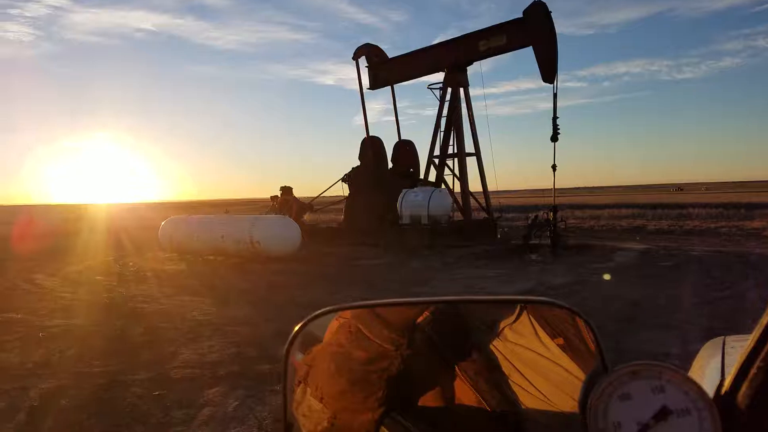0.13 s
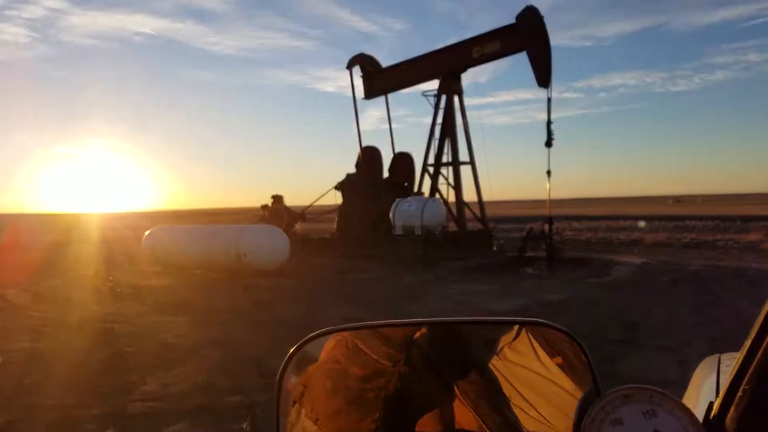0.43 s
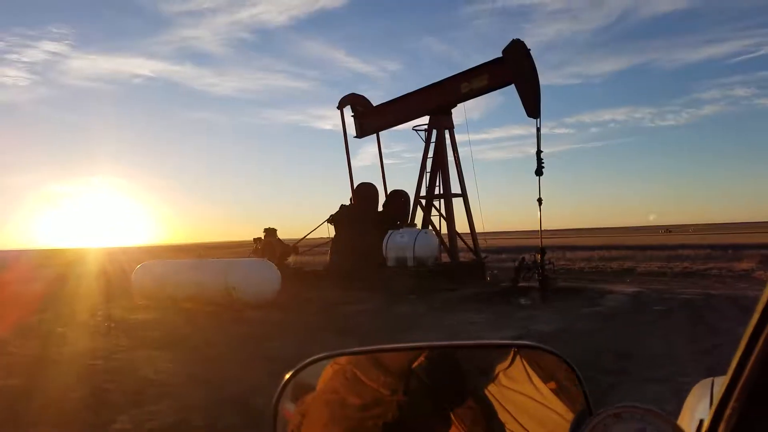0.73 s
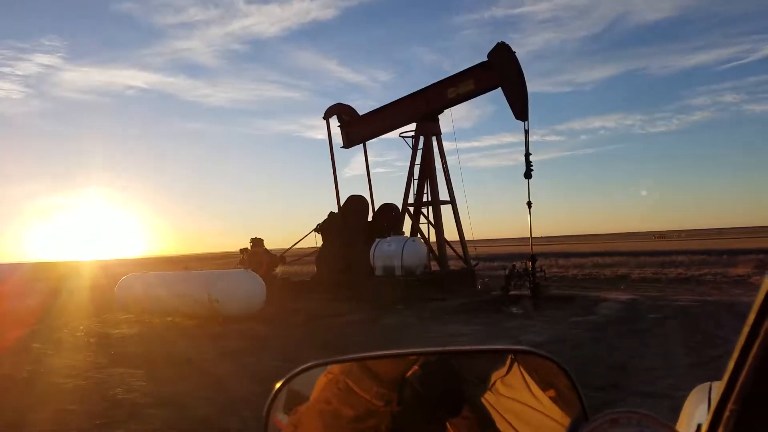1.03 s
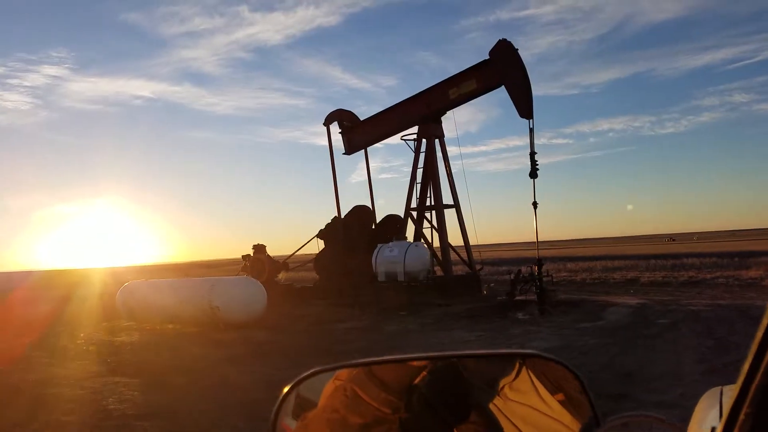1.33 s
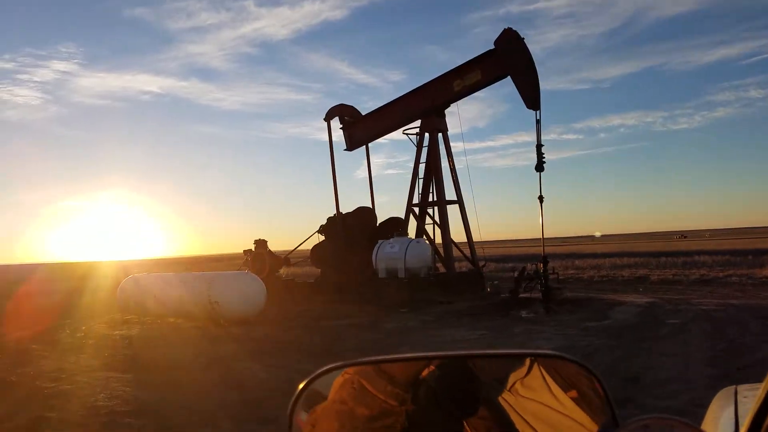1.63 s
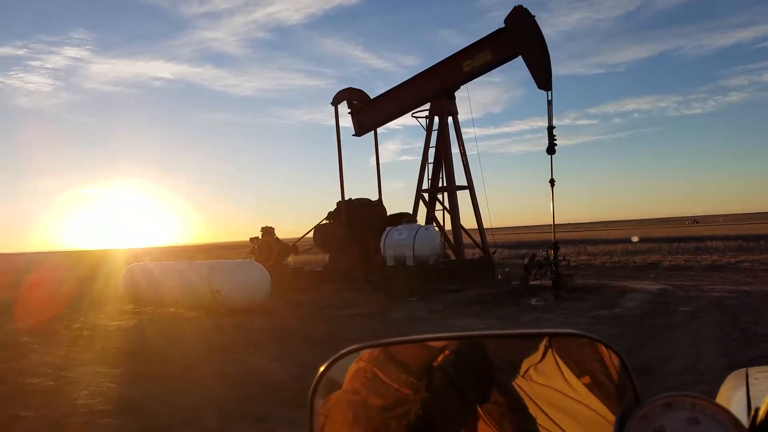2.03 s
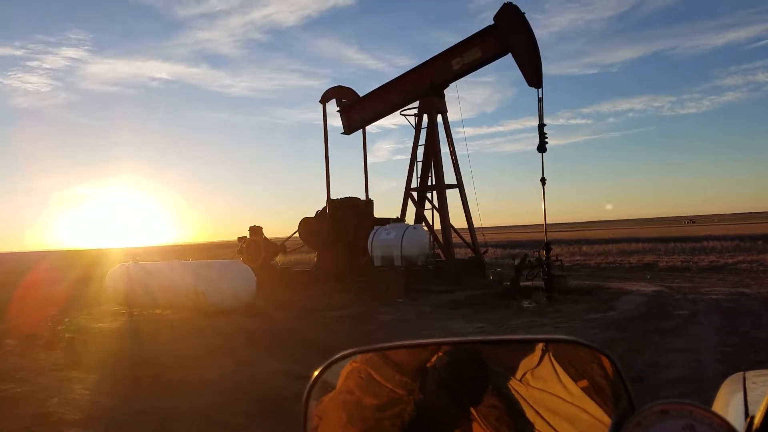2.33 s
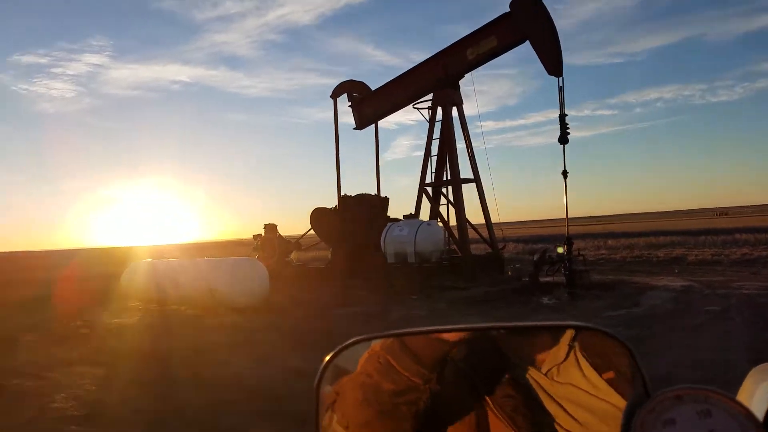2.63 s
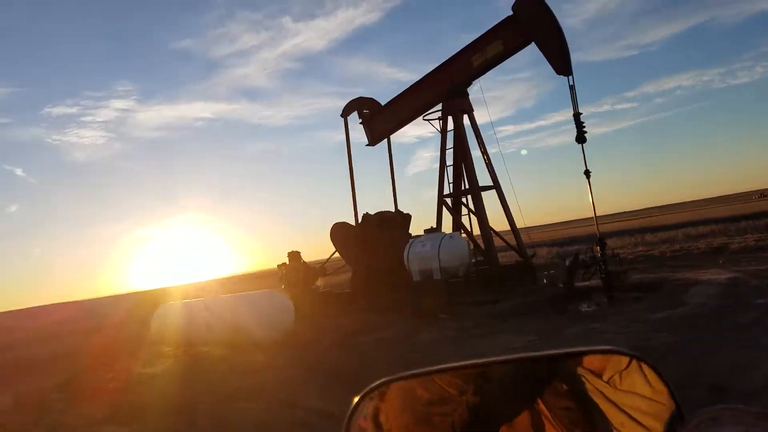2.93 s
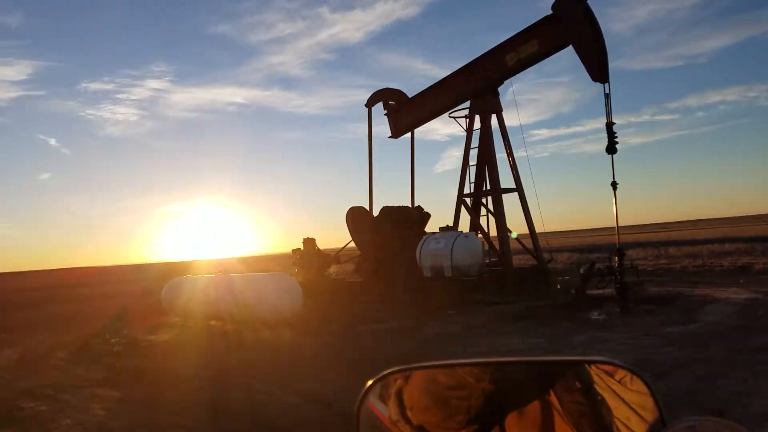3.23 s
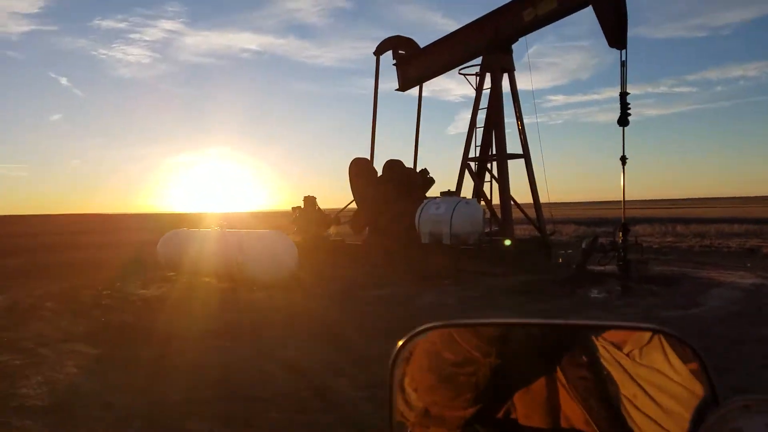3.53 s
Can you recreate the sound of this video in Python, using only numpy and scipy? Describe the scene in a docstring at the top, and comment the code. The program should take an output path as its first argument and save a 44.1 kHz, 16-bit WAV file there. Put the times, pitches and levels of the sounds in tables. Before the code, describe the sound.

Rough engine rumble at an oil pump, chuffing about four times a second with high dry squeaks.

```python
"""After a brief silence, a lumpy eight-cylinder engine is heard already idling close by on open ground:
uneven firings boom in its exhaust under throbbing fan noise and valve ticks. With it something dry,
probably a belt, chafes and soon rasps, amid faint treble wisps. After a dry knock an oil pumpjack's slow
engine chuffs about four times a second, each puff of gas ringing its metal. Then loose parts rattle now
and then, the belt squeaks on and off as a gliding tone with its octave, and a few thin chirps glide above;
a softer knock comes late."""
import sys
import numpy as np
from scipy import signal
from scipy.fft import rfft, irfft, next_fast_len
from scipy.io import wavfile

SR = 44100
rng = np.random.default_rng(int(sys.argv[2]) if len(sys.argv) > 2 else 0)


def to_wav(sig):
    """Store sig (one row per channel, or 1-D mono) as 16-bit WAV at the path in sys.argv[1].

    Samples outside -1..1 are clipped; the rate is SR.
    """
    pcm = np.clip(np.atleast_2d(sig), -1, 1) * 32767
    pcm = np.round(pcm).astype(np.int16)
    wavfile.write(sys.argv[1], SR, pcm.T)  # frames by channels


N = 163170


def undb(db):
    """Decibels to gain."""
    return 10 ** (np.asarray(db) / 20)


def unit(x):
    """Scale to rms 1."""
    return x / np.sqrt(np.mean(x ** 2))


def times():
    """Time of each sample in seconds."""
    return np.arange(N) / SR


def curve(rows, axis=1):
    """Join the rows of a control by straight lines."""
    rows = np.array(rows)
    return np.interp(times(), rows[:, 0], rows[:, axis])


def filtered(x, response):
    """Apply a frequency response, given as a function of Hz."""
    size = next_fast_len(N + N // 2)
    f = np.maximum(np.fft.rfftfreq(size, 1 / SR), 1)
    return irfft(rfft(x, size) * response(f), size)[..., :N]


def colour(x, points):
    """Filter by (Hz, dB) points, joined along log frequency."""
    hz, db = np.array(points).T
    return filtered(x, lambda f: undb(np.interp(np.log(f), np.log(hz), db)))


def resonance(f, hz, width):
    """Response of one resonance, 1 at its centre."""
    return 1 / (1 + 1j * (f / hz - hz / f) * hz / width)


def highpass(f, hz):
    """Response of a second-order high-pass."""
    s = 1j * f / hz
    return s * s / (1 + np.sqrt(2) * s + s * s)


def lowpass(f, hz):
    """Gentle treble loss, halving the amplitude at hz, with no phase shift."""
    return 1 / (1 + (f / hz) ** 2)


def walk(rate):
    """Random points, `rate` a second, joined by straight lines; spread near 1."""
    knots = rng.standard_normal(N)
    return np.interp(times() * rate, np.arange(N), knots) * np.sqrt(3 / 2)


def pan(db):
    """Left and right gains, for left over right in dB."""
    return undb(np.array([[db], [-db]]) / 2)


def burst(start, attack, decay):
    """Linear attack, exponential decay."""
    age = times() - start
    return np.clip(age / attack, 0, 1) * np.exp(-np.clip((age - attack) / decay, 0, 20))


def arch(u):
    """Rounded swell over u = 0..1."""
    return np.sqrt(np.abs(np.sin(np.pi * np.clip(u, 0, 1))))


def tone(hz, rough):
    """A sine of rms 1 whose pitch trembles by the share `rough`."""
    trembling_hz = hz * (1 + rough * walk(rate=1800))
    return unit(np.sin(2 * np.pi * np.cumsum(trembling_hz) / SR))


def after(pulses, decay):
    """Envelope of rms 1 that jumps at every pulse and dies away."""
    return unit(signal.lfilter([1], [1, -np.exp(-1 / (decay * SR))], pulses))


# stereo spread of all the noise: (f/Hz, side over mid/dB)
SIDE_DB = [(30, 12), (80, -16.5), (180, -16), (350, -9.5), (700, -10.5), (1400, -4), (2800, 0.5),
           (6000, -1), (12000, 0.5)]


def air():
    """Stereo noise from a white mid and a coloured side, narrow in the low mids and wide in the treble."""
    mid, side = rng.standard_normal((2, N))
    side = colour(side, SIDE_DB)
    return np.array([mid + side, mid - side])


CYCLE_S, JITTER_S = .19088, .0003  # all eight firings; random spread of each firing's time
# cylinders in firing order: (delay to the tailpipe/s, level/dB)
CYLINDERS = [(.0209, 3.8), (.0174, -5.4), (.0212, -2), (.0193, 1.7), (.021, -8.7), (.0214, 6.3),
             (.0203, 2.6), (.0197, -.6)]


def firings():
    """One pulse per cylinder, each with its own strength and a little off in time."""
    delay, db = np.array(CYLINDERS).T
    k = np.arange(int(N / SR / CYCLE_S * len(db)) + 1)
    cylinder = k % len(db)
    at = k * CYCLE_S / len(db) + delay[cylinder] + JITTER_S * rng.standard_normal(len(k))
    pulses = np.zeros(N)
    pulses[np.clip((at * SR).astype(int), 0, N - 1)] = undb(db[cylinder])
    return pulses


EXHAUST_DB, RUMBLE_DB = 27.5, -43.5
PIPE_CUT_HZ, MUFFLER_HZ = 42.4, 900  # low cut and treble loss of the boom
# exhaust resonances: (f/Hz, width/Hz, signed gain)
PIPE = [(70.9, 9, .58), (88.6, 9, .46), (97, 22, -.44), (126.7, 9, .13), (158, 9, -.1), (176, 10, -.12)]
# colour of the gas rumble: (f/Hz, relative level/dB)
RUMBLE = [(20, -15), (40, -26), (60, -8), (100, 7), (172, 3.5), (192, -9), (400, -62)]
# level ride of boom and rumble together: (t/s, level/dB)
BASS = [(.105, 9.5), (.148, -3.5), (.16, 11), (.36, 12.5), (.45, 7), (.6, 8), (.72, 2.5), (.85, 0),
        (1.4, 0), (1.8, 1.15), (3.7, 0.6)]


def exhaust(pulses):
    """Firings ring the muffled pipe; turbulent gas rumbles with them."""
    def pipe(f):
        modes = sum(gain * resonance(f, hz, width) for hz, width, gain in PIPE)
        return modes * highpass(f, PIPE_CUT_HZ) / (1 + (f / MUFFLER_HZ) ** 4)

    boom = filtered(pulses, pipe)
    gas = unit(colour(air() * after(np.sqrt(pulses), decay=0.07), RUMBLE))
    return (undb(EXHAUST_DB) * boom + undb(RUMBLE_DB) * gas) * undb(curve(BASS))


FAN_DB, TICK_DB, TICK_S = -41, -47.5, 0.0086  # TICK_S: decay
FAN_THROB, THROB_DECAY = 0.16, 0.38  # depth; decay as a share of the mean firing interval
TREBLE_FLICKER_DB, TREBLE_FLICKER_RATE = 1.35, 27  # spread; random points a second
# colour of the fan noise ahead of its low cut: (f/Hz, relative level/dB)
FAN = [(120, -43), (205, 0), (270, 4), (360, -2), (401, 4), (456, -3), (579, -2.5), (635, -6), (851, -4.5),
       (1140, -6), (1680, -11), (2470, -11.5), (2910, -14.5), (3970, -16.5), (5130, -25.5), (7830, -19),
       (16000, -43.5)]
# level ride of the fan, crossing over near 1 kHz: (t/s, low level/dB, high level/dB)
FAN_LEVEL = [(.1, -2.5, -5), (.2, 1.5, 0.5), (.8, 0, 2.5), (1.5, 1, 2.5), (2, 2.5, 3.5), (2.9, 2.5, 2.5),
             (3.52, 2.5, 2), (3.6, 6, 5), (3.7, 0.5, 4)]
# colour of the valve ticks: (f/Hz, relative level/dB)
TICKS = [(200, -20), (500, 3), (1300, 15.5), (3000, -9.5), (5000, -12), (8000, -12), (15000, -43)]


def engine_bay(pulses):
    """Fan noise flickers, its lower part throbbing with the firings; the valves tick."""
    fan = unit(filtered(colour(air(), FAN), lambda f: highpass(f, hz=182) ** 2))
    low = filtered(fan, lambda f: lowpass(f, 1000))
    flicker_db = TREBLE_FLICKER_DB * walk(TREBLE_FLICKER_RATE)
    high = (fan - low) * undb(curve(FAN_LEVEL, axis=2) + flicker_db) * pan(db=3.5)
    throb_decay = THROB_DECAY * CYCLE_S / len(CYLINDERS)
    throb = unit(1 + FAN_THROB * after(np.sqrt(pulses), throb_decay))
    fan = low * undb(curve(FAN_LEVEL)) * throb + high
    # one tick per firing, of random strength
    strikes = (pulses > 0) * undb(2.8 * walk(rate=60))
    ticks = unit(colour(air(), TICKS) * after(strikes, TICK_S))
    return undb(FAN_DB) * fan * undb(0.99 * walk(rate=45)) + undb(TICK_DB) * ticks


SLIP_RATE, SLIP_S = 45, .02  # mean slips a second; longest slip
SLIP_SCATTER_DB, SLIP_GLIDE = 2.5, 0.0306  # spread of strength; spread of glide as a share of pitch


def slips(centre_hz, spread_hz):
    """Pitch and envelope of a chain of tiny slips, each with its own length, pitch, glide and strength."""
    count = int(2 * SLIP_RATE * N / SR)
    gap, pitch = rng.random((2, count))
    glide, size = rng.standard_normal((2, count))
    starts = np.cumsum(.5 + gap) / SLIP_RATE
    k = np.maximum(np.searchsorted(starts, times()) - 1, 0)
    length = np.minimum(SLIP_S, starts[k + 1] - starts[k])
    u = np.clip((times() - starts[k]) / length, 0, 1)
    slip_hz = centre_hz + spread_hz * (2 * pitch[k] - 1)
    hz = slip_hz * (1 + SLIP_GLIDE * glide[k] * (u - .5))
    return hz, arch(u) * undb(SLIP_SCATTER_DB * size[k])


SQUEAK_PAN_DB, SQUEAK_LAG_S = -9, .00003  # left over right; delay of the right side
OCTAVE_DB, OCTAVE_BEST_HZ, OCTAVE_WIDTH_HZ = -5.5, 7960, 430


def squeal(hz, octave_db):
    """A stick-slip tone, later on the right, whose octave sings out only near one resonance."""
    phase = 2 * np.pi * (np.cumsum(hz) / SR + np.outer([1, 0], hz * SQUEAK_LAG_S))
    octave = undb(octave_db) * np.abs(resonance(2 * hz, OCTAVE_BEST_HZ, OCTAVE_WIDTH_HZ)) ** 2
    return np.sqrt(2) * (pan(SQUEAK_PAN_DB) * np.sin(phase) + octave * np.sin(2 * phase))


CHAFE_HZ, CHAFE_SPREAD_HZ, CHAFE_DB = 3750, 380, -54.5


def belt_chafe():
    """Faint broken stick-slip tones run on between the squeaks."""
    hz, swell = slips(CHAFE_HZ, CHAFE_SPREAD_HZ)
    rough_hz = hz * (1 + .02 * walk(rate=800))
    return undb(CHAFE_DB) * swell * squeal(rough_hz, OCTAVE_DB)


THIN_ROUGH = .015  # pitch roughness of wisps and chirps, as a share
WISP_HZ, WISP_SPREAD_HZ = 10400, 3400
WISP_DB, WISP_DB_PER_OCTAVE = -60.5, -17  # level at WISP_HZ; fall towards higher pitch


def wisps():
    """Faint squeaky slips scatter through the treble, a separate chain on either side."""
    sides = []
    for _ in range(2):
        hz, swell = slips(WISP_HZ, WISP_SPREAD_HZ)
        db = WISP_DB + WISP_DB_PER_OCTAVE * np.log2(hz / WISP_HZ)
        sides.append(undb(db) * swell * tone(hz, THIN_ROUGH))
    return np.array(sides)


RASP_HZ, RASP_WANDER_HZ, RASP_ROUGH = 7680, 190, .037  # centre; slower wander; fast tremble as a share
# thin high rasps: (t/s, length/s, level/dB)
RASPS = [(0.15, 0.19, -51.5), (0.556, 0.078, -49), (.76, 0.16, -51), (1.034, 0.14, -47.5),
         (1.892, .14, -43), (2.275, 0.29, -52), (2.558, 0.013, -43), (2.807, 0.057, -46.5),
         (3.588, 0.17, -45)]


def belt_rasps():
    """Rough tones about an octave above the squeaks, trembling separately left and right."""
    hz = RASP_HZ + RASP_WANDER_HZ * walk(rate=86)
    rasp = np.array([tone(hz, RASP_ROUGH) for _ in range(2)])
    return rasp * sum(undb(db) * arch((times() - s) / length) for s, length, db in RASPS)


# small knocks: (t/s, level/dB, decay/s, dull above f/Hz)
KNOCKS = [(.154, -18.5, 0.00097, 1870), (2.78, -39, .003, 7000)]


def knocks():
    """Small dry knocks: dulled noise that starts at once and dies in milliseconds."""
    out = 0
    for s, db, decay, hz in KNOCKS:
        noise = unit(filtered(air(), lambda f: lowpass(f, hz)))
        out = out + undb(db) * burst(s, 0.0001, decay) * noise
    return out


CHUFF_DB, CHUFF_ATTACK_S, CHUFF_DECAY_S = -37.5, 0.0094, 0.018  # the gas; the metal shares its attack
CHUFF_PAN_DB, CHUFF_PAN_DB_PER_S = 9, -2.3  # left over right; the pump drifts to the middle
RING_GRAIN_DB = 2  # random spread of the ring's level
# colour of the gas puffs: (f/Hz, relative level/dB)
CHUFF = [(300, -4), (900, -25), (1200, 21), (1600, -6), (2200, 7), (3200, 6.5), (5500, 3), (8000, 11),
         (10500, 4), (15000, -65)]
# ringing modes of the pump engine's metal, lowest first: (f/Hz)
PUMP_MODES_HZ = [1140, 2083, 2419]
# how each of these modes rings: (decay/s, level/dB, roughness of pitch as a share)
PUMP_MODES = [(.016, -41.5, .025), (.02, -44, 0.018), (.04, -49, .008)]
# chuffs, with the outer modes' extra ring: (t/s, level/dB, lowest mode/dB, highest mode/dB)
CHUFFS = [(.185, -5.5, 6.5, 4), (.438, -2.5, 3, -6), (0.683, -1, 5, -3), (.932, -2.5, 4, -4),
          (1.174, -1.5, -18, 5.5), (1.422, -0.5, 6, 1.5), (1.657, -3.5, 5, 3), (1.9, -1, -19, 6),
          (2.136, -1.5, -10, 5.5), (2.373, -2.5, 0, 4.5), (2.607, 0, -8, -1), (2.843, -13, -10, -4),
          (3.072, -3.5, -7, 2), (3.303, -4, 1, 7.5), (3.534, -3, -1, 2)]


def pump():
    """Each chuff is a puff of gas that also sets the metal ringing roughly, the outer modes varying."""
    gas = undb(CHUFF_DB) * unit(colour(air(), CHUFF))
    rings = []
    for hz, (_, db, rough) in zip(PUMP_MODES_HZ, PUMP_MODES):
        grain = unit(undb(RING_GRAIN_DB * walk(rate=150)))
        rings.append(undb(db) * tone(hz, rough) * grain)
    out = 0
    for s, db, lowest, highest in CHUFFS:
        puff = gas * burst(s, CHUFF_ATTACK_S, CHUFF_DECAY_S)
        metal = sum(undb(share) * ring * burst(s, CHUFF_ATTACK_S, mode[0])
                    for ring, mode, share in zip(rings, PUMP_MODES, [lowest, 0, highest]))
        out = out + undb(db) * pan(CHUFF_PAN_DB + CHUFF_PAN_DB_PER_S * s) * (puff + metal)
    return out


RATTLE_ATTACK_S, RATTLE_DECAY_S, RATTLE_WIDTH_HZ = 0.0038, 0.014, 570
# loose metal rattles: (t/s, level/dB, centre f/Hz)
RATTLES = [(0.318, -37.5, 1300), (2.086, -41.5, 1870), (3.137, -37.5, 1480), (3.538, -36.5, 2210)]


def rattles():
    """Short, soft clatter of loose parts: noise bursts through a doubled resonance."""
    out = 0
    for s, db, hz in RATTLES:
        noise = unit(filtered(air(), lambda f: resonance(f, hz, RATTLE_WIDTH_HZ) ** 2))
        out = out + undb(db) * burst(s, RATTLE_ATTACK_S, RATTLE_DECAY_S) * noise
    return out


SQUEAK_DB = -1.5  # trim on every squeak
WOBBLE, WOBBLE_RATE = 0.0132, 310  # pitch spread as a share; random points a second
# octave dB lost per dB of rise in table level; table level where the octave is OCTAVE_DB
OCTAVE_FALL, OCTAVE_REF_DB = 0.14, -31
# squeaks: (t/s, length/s, start f/Hz, middle f/Hz, end f/Hz, level before the trim/dB)
SQUEAKS = [(0.349, 0.037, 4160, 3980, 3900, -40), (0.381, 0.026, 3950, 4124, 4080, -33.5),
           (0.456, 0.035, 4130, 4080, 3820, -45), (0.497, 0.061, 3700, 3910, 3760, -45.5),
           (0.569, 0.061, 4010, 3840, 3720, -43), (0.745, .03, 3460, 3520, 3500, -46),
           (.825, 0.035, 3770, 3880, 3530, -46), (0.941, 0.055, 3740, 3730, 3940, -44),
           (0.977, 0.034, 4080, 3810, 3620, -48), (1.031, .03, 3720, 3650, 3380, -46),
           (1.231, 0.039, 3790, 4074, 3850, -42.5), (1.259, 0.045, 3860, 4060, 3900, -38),
           (1.34, 0.025, 3750, 4130, 4130, -42.5), (1.401, 0.037, 3780, 3920, 3900, -46),
           (1.428, 0.043, 3800, 3770, 3780, -45), (1.484, 0.027, 3700, 3610, 3580, -45),
           (1.547, 0.02, 3650, 3750, 3650, -46), (1.613, 0.045, 3540, 3620, 3420, -47.5),
           (1.683, 0.034, 3680, 3650, 3800, -44), (1.761, 0.022, 3600, 3730, 3720, -45.5),
           (1.822, 0.026, 3670, 3680, 3750, -41.5), (1.838, 0.025, 4000, 3980, 3900, -41.5),
           (1.907, 0.044, 3700, 3560, 3530, -40.5), (2.005, 0.035, 3570, 3520, 3430, -45),
           (2.108, 0.067, 3910, 4050, 4070, -40.5), (2.264, .034, 4060, 3980, 4020, -45.5),
           (2.625, .053, 3880, 3780, 3860, -45.5), (2.701, 0.02, 3930, 3960, 3930, -42.5),
           (2.953, 0.046, 3850, 3980, 4200, -42), (3.094, .05, 3990, 3880, 4000, -47),
           (3.19, .034, 3876, 3876, 3750, -45.5), (3.408, 0.069, 3880, 3860, 3720, -46),
           (3.534, 0.03, 3920, 3900, 3660, -43.5)]


def belt_squeaks():
    """Short stick-slip tones glide unsteadily through three pitches; louder ones are purer."""
    t, out = times(), np.zeros((2, N))
    wobble = 1 + WOBBLE * walk(WOBBLE_RATE)
    for s, length, first, middle, last, db in SQUEAKS:
        on = (t >= s) & (t < s + length)
        u = (t[on] - s) / length
        glide = np.polyfit([0, .5, 1], [first, middle, last], 2)
        hz = np.polyval(glide, u) * wobble[on]
        octave_db = OCTAVE_DB - OCTAVE_FALL * (db - OCTAVE_REF_DB)
        out[:, on] += undb(db + SQUEAK_DB) * arch(u) * squeal(hz, octave_db)
    return out


FLUTTER_DB = 2.5  # random spread of the belt's level


def belt():
    """Chafing, rasps and squeaks flutter in level together."""
    flutter = unit(undb(FLUTTER_DB * walk(rate=240)))
    return flutter * (belt_chafe() + belt_rasps() + belt_squeaks())


# thin chirps above the squeaks: (t/s, length/s, start f/Hz, end f/Hz, level/dB)
CHIRPS = [(.408, 0.022, 6230, 6750, -53), (2.21, .05, 13300, 13600, -65), (2.69, .045, 13700, 13550, -67),
          (3.052, 0.026, 6500, 6400, -52)]


def chirps():
    """Thin, rough tones that glide straight from one pitch to another."""
    t, out = times(), 0
    for s, length, first, last, db in CHIRPS:
        hz = np.interp(t, [s, s + length], [first, last])
        out = out + undb(db) * arch((t - s) / length) * tone(hz, THIN_ROUGH)
    return out


def scene():
    """The idling vehicle and the pump, with no echo."""
    pulses = firings()
    engine = exhaust(pulses) + engine_bay(pulses)
    return engine + belt() + wisps() + knocks() + pump() + rattles() + chirps()


START_S, TOP_HZ = .105, 15800  # length of the opening silence; top of the treble


def record(dry):
    """The whole sound opens up over about a millisecond and a steep low-pass takes off its top."""
    gate = np.clip((times() - START_S) / 0.0013, 0, 1)
    top_cut = signal.ellip(10, .2, 70, TOP_HZ, fs=SR, output="sos")
    return signal.sosfilt(top_cut, dry * gate)


dry = scene()
out = record(dry)
to_wav(out)
```